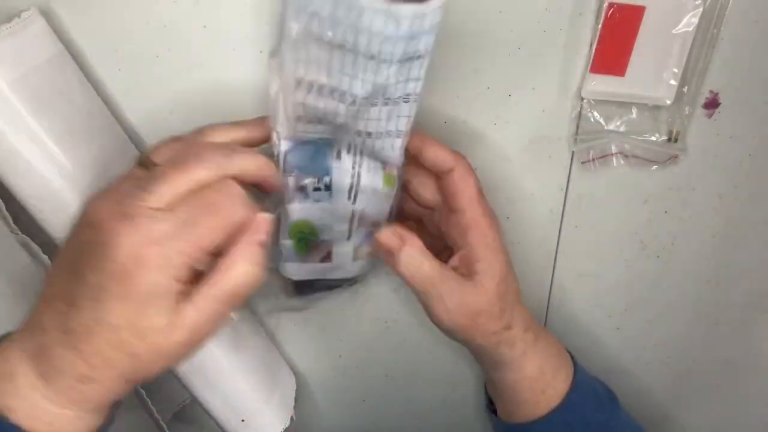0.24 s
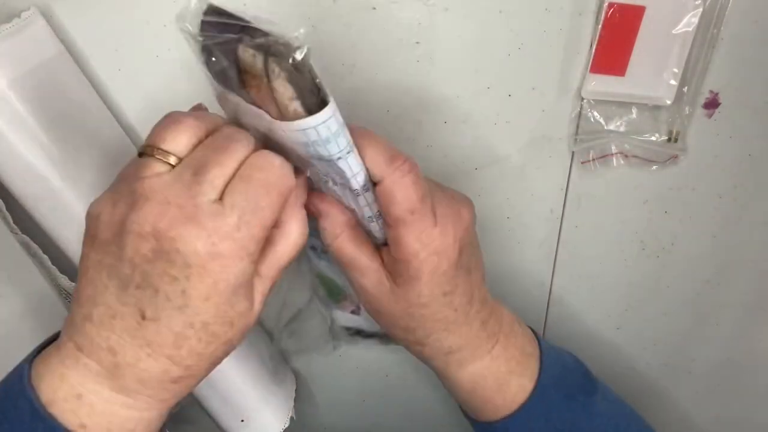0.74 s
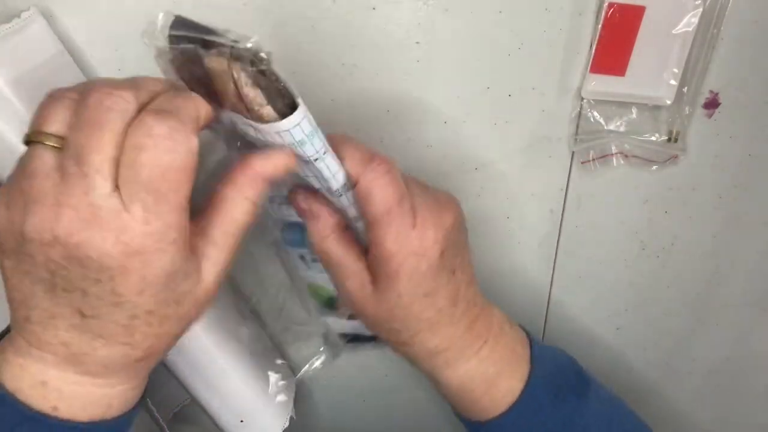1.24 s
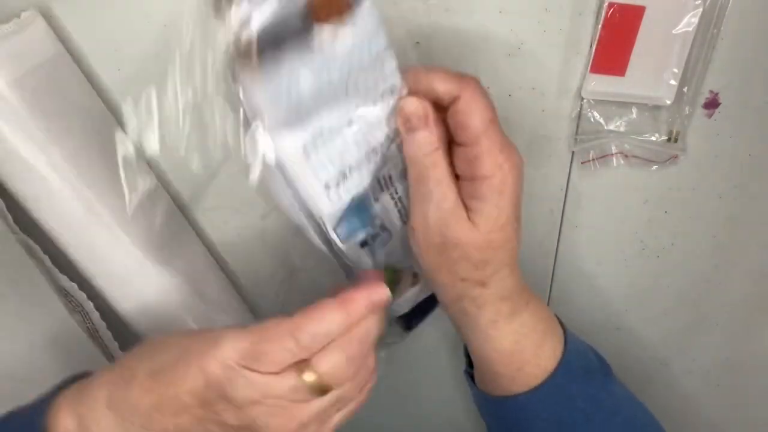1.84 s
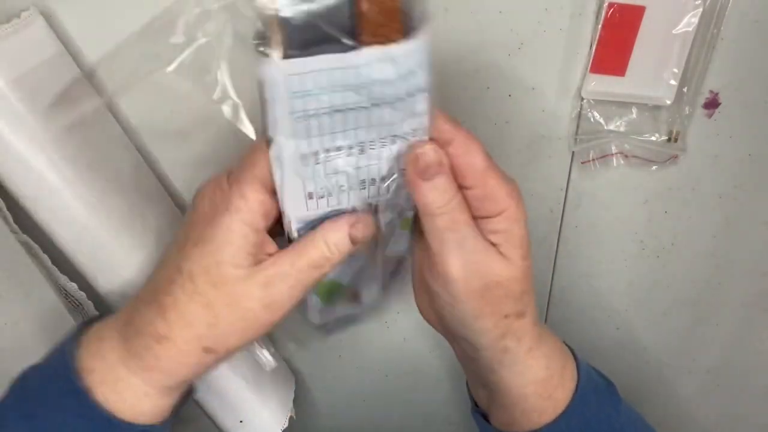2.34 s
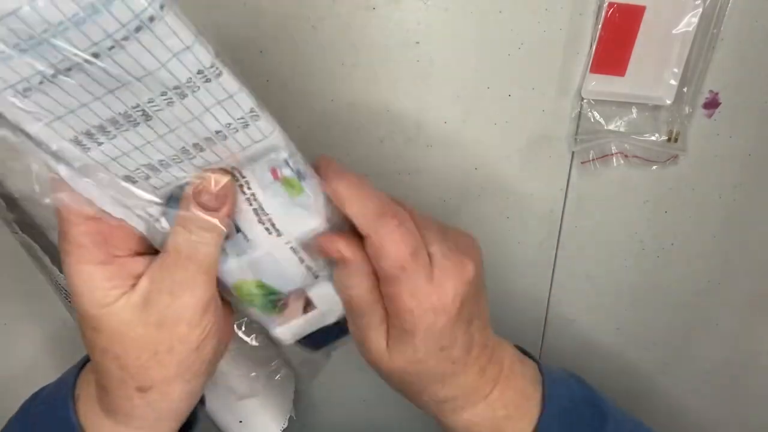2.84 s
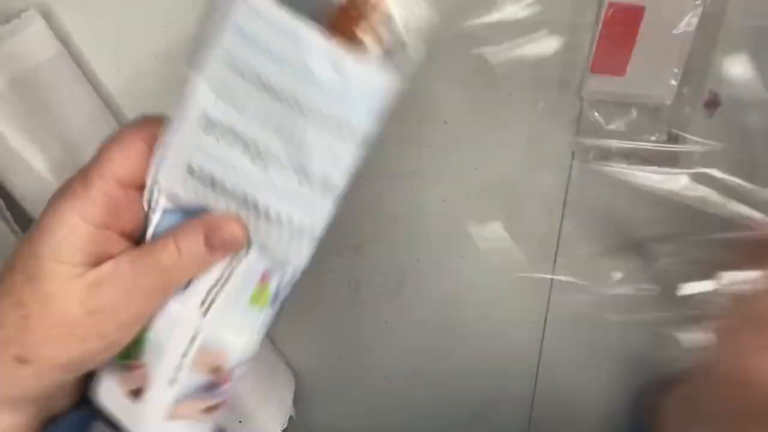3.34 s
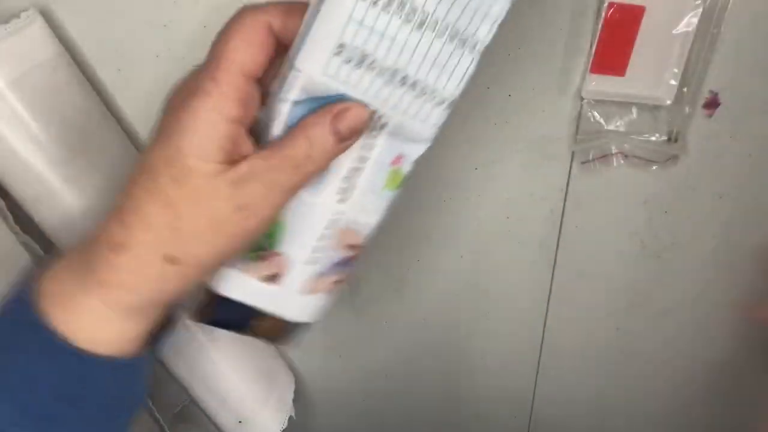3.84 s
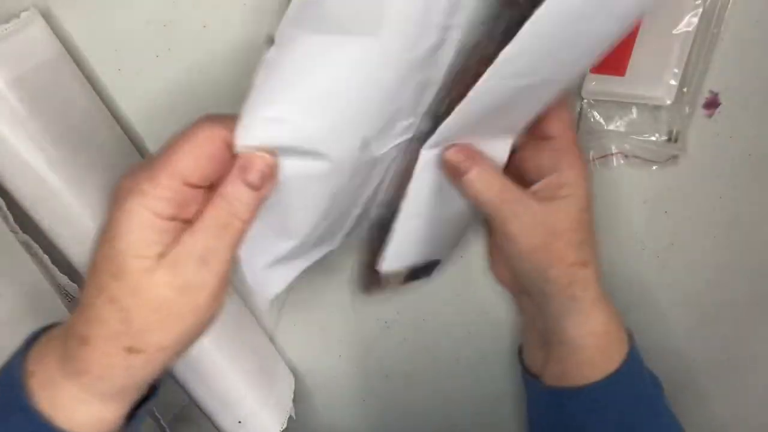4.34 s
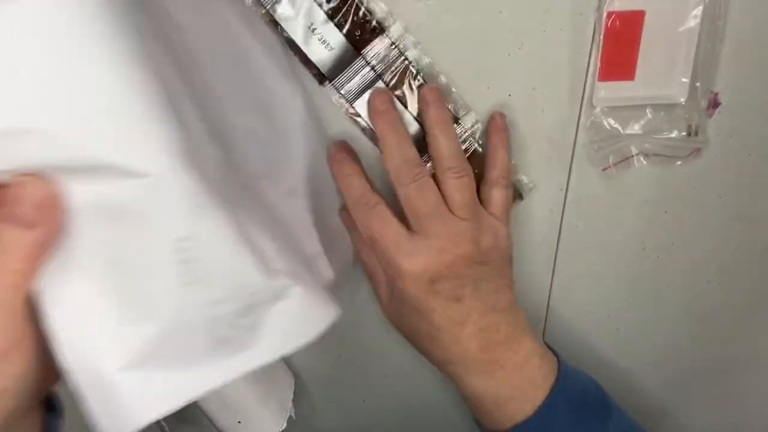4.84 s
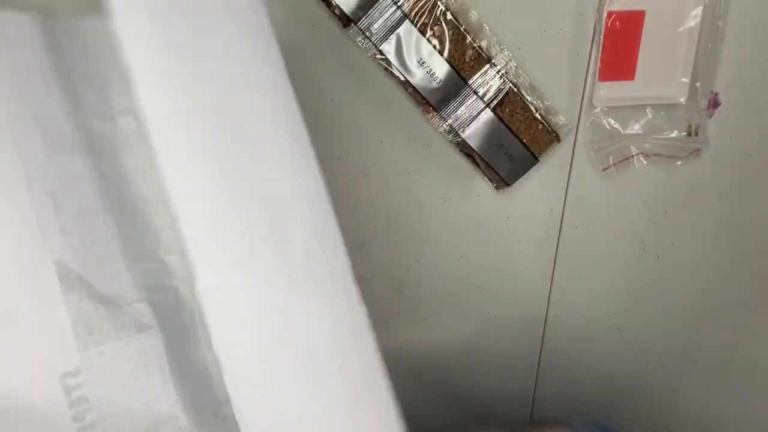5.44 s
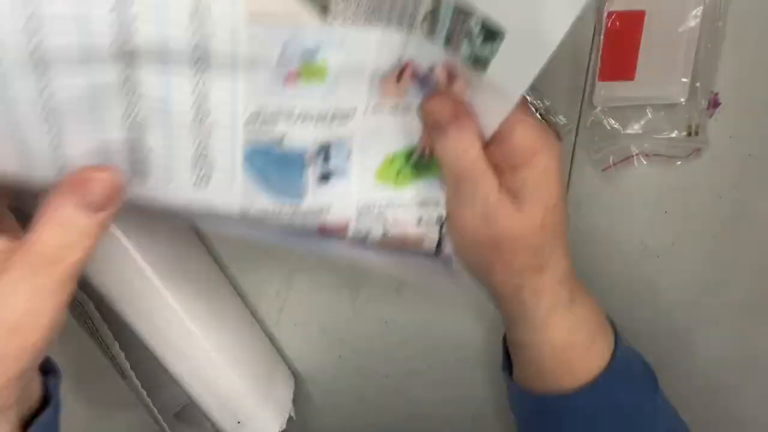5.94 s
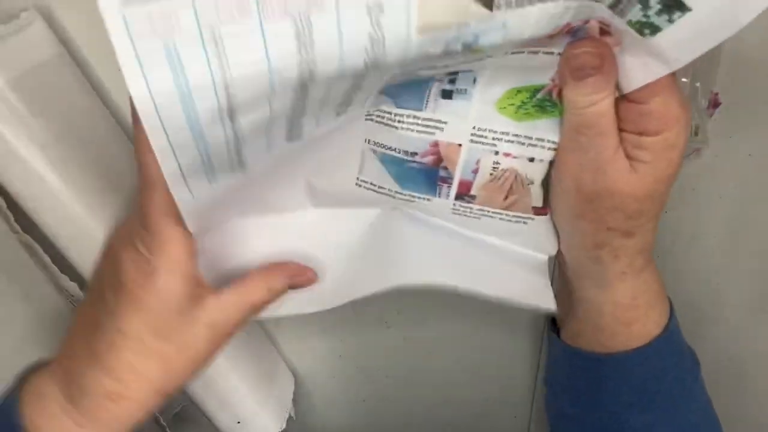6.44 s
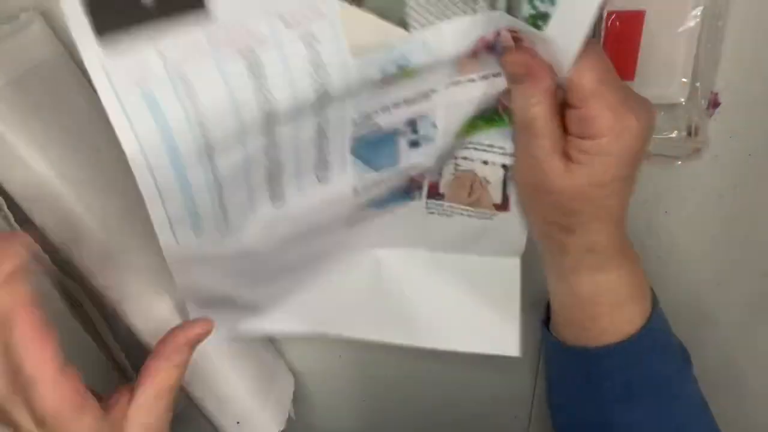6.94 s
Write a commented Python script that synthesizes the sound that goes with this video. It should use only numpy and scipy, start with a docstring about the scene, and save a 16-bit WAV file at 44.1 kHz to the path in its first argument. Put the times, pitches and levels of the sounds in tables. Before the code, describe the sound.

Close stereo pickup in a small, dry room. Hands work a folded leaflet out of a crisp plastic sleeve in bright, irregular crackles with one sharp pop early on. The handling quiets, then a packet lands on the table with a low, soft thump. Smooth paper sliding and low flapping follow, and finally the sheet is unfolded with louder, duller snaps and hollow pops.

```python
"""Crackle of plastic and paper: hands pull a leaflet from a sleeve, tip a packet onto the table, unfold the sheet.
Each stroke sets off a swarm of tiny buckles: noise bursts in three voices (flex, crease, tick); sliding hisses.
Big buckles snap as jerky noise bursts; dents pop as short tones that sag in pitch. Plastic is bright, paper dull.
The table takes soft thumps (falling sweeps, knock, low mode) and rings as the packet lands.
A small room and a close pair of microphone ports hear it, over a faint room tone."""
import sys
import numpy as np
from scipy import signal
from scipy.fft import rfft, irfft, next_fast_len
from scipy.io import wavfile

SR = 44100
rng = np.random.default_rng(int(sys.argv[2]) if len(sys.argv) > 2 else 0)


def digitize_waveform(pressure):
    """Quantize a signal to 16-bit integers and store it at the path in sys.argv[1].

    Rows of a 2-D input are taken as channels; values are limited to [-1, 1].
    """
    field = np.atleast_2d(pressure).T
    bounded = np.clip(field, -1, 1)
    quanta = np.round(bounded * 32767).astype(np.int16)
    wavfile.write(sys.argv[1], SR, quanta)


N = 316988
TIME_S = np.arange(N) / SR

# room decay: f/Hz, t60/s
ROOM_T60 = [(100, 0.26), (700, 0.086), (14000, 0.047)]
# room tone spectrum: f/Hz, density/dB per Hz
ROOM_TONE = [(25, -17), (70, 14), (1000, -14), (15000, -43)]
# low table modes: f/Hz, level/dB
TABLE_MODES = [(101, -22.5), (270, -24.5), (368, -24)]
# bumps of hands and sheet on the table: t/s, sweep level/dB, start pitch f/Hz
THUMPS = [(0.702, -36, 222), (1.376, -29, 373), (3.193, -34, 260), (3.33, -33, 172), (4.051, -33.5, 219),
          (4.286, -32.5, 240), (4.477, -24, 482), (4.595, -25, 190), (4.874, -21.5, 168), (5.192, -37, 394),
          (5.279, -30, 130), (5.568, -25.5, 300), (5.683, -26, 433)]
# whole dents that flip at one pitch: t/s, rise/ms, tone peak/dB, settled pitch f/Hz
POPS = [(.884, 1.8, -22.5, 720), (1.186, 1, -22.5, 1420), (1.5583, 0.11, -2.5, 3000),
        (1.8327, 1.1, -18.5, 874), (3.083, 0.48, -18, 1000), (3.6064, 0.17, -11, 1750),
        (3.811, 0.47, -30, 720), (3.8646, 0.51, -30.5, 1650), (3.911, 0.46, -35, 1300),
        (4.0338, 0.43, -20.5, 1040), (4.0481, 0.74, -16.5, 800), (4.4877, 1.8, -16, 790),
        (5.613, 0.78, -10.5, 463), (5.8472, 0.95, -12.5, 593), (5.9025, 1.1, -31.5, 544),
        (6.1, 1.2, -14.5, 870), (6.1155, 0.58, -9.5, 670), (6.2402, 0.92, -20, 790),
        (6.2556, 1.8, -20, 640), (6.2863, 0.32, -17, 1580), (6.4164, 1.1, -22.5, 740),
        (6.4397, 0.65, -17, 1900), (6.5167, 0.74, -16.5, 735), (6.6897, 0.37, -9.5, 1940),
        (6.7442, 0.31, -20, 1050), (6.7943, 0.92, -24, 537), (6.9127, 4.1, -24.5, 598)]
# typical small-dent pitch in flex, crease, tick: f/Hz
DENT_HZ = (790, 2330, 8830)
# single big buckles: t/s, decay/ms, crease level/dB, tilt/dB (+ bright, - dull)
SNAPS = [(.0097, 1, -22.5, -5), (0.0374, 2.8, -21, -5.5), (0.21, 3.8, -30.5, -4), (.315, 2.5, -28.5, 1),
         (0.3591, 1.9, -25.5, 3), (0.3838, 1.2, -24, 2.5), (0.532, 0.52, -36.5, 7.5),
         (0.47, 0.92, -41.5, 14.5), (.571, 1.4, -36.5, 0), (0.6468, 2.2, -27, -1.5),
         (0.697, 1.05, -32, 1.5), (.829, 7, -17.5, -2), (.853, 1.8, -25, 5), (1.0441, 2.4, -28.5, 3.5),
         (1.0548, 3.8, -28, -6.5), (1.0876, 3, -27.5, 3.5), (1.13, 1.16, -33, 4), (1.276, 7.5, -28, -2),
         (1.308, 4.7, -25.5, 5), (1.3196, 1, -26.5, -8), (1.419, 12, -26, 5), (1.504, 1, -36.5, 5),
         (1.6067, .6, -34.5, 0), (1.616, 1.1, -29, -1), (1.6857, 2.4, -28, 3.5), (1.709, 0.5, -32, 10),
         (1.7799, 2.95, -26.5, -3.5), (1.9236, 2.8, -33, 3), (2.0126, 0.68, -27, 3.5), (2.183, 2, -37, 14),
         (2.3526, 3.1, -28, -4), (2.429, 5.5, -22, 5), (2.5341, 3.6, -27, -3.5), (2.5887, 1.55, -31, -6),
         (2.635, 0.77, -29, 5), (2.686, 2, -25.5, 6), (2.738, 1.1, -34.5, 6), (2.7724, 3.6, -26.5, 4.5),
         (2.8157, 3.9, -27, 3), (2.8416, 1.8, -29, 2), (2.8565, 0.99, -33, 6.5), (2.914, 5, -26, 5),
         (2.99, 1, -32.5, 5), (3.0454, 1.5, -27, 13.5), (3.144, 2.2, -28.5, 11.5), (3.187, 4.5, -21.5, 0.5),
         (3.273, 2.2, -28.5, 3), (3.4106, 1.7, -34, 11.5), (3.42, 0.76, -29, 1), (3.5016, 3.1, -33.5, 10.5),
         (3.552, 2.25, -31, 7), (3.575, 0.71, -35.5, 4), (3.638, 0.93, -41, 12.5), (3.7295, .6, -43.5, 1.5),
         (3.7756, 1.9, -40.5, 6), (3.838, 1.2, -43, 2), (3.9713, 3.4, -35.5, -4.5),
         (4.012, 2.5, -28.5, -0.5), (4.047, 1.6, -27.5, 2.5), (4.1795, 5.3, -28, -2.5),
         (4.412, 3.8, -30.5, -5), (4.4884, 1.44, -25, 0.5), (5.026, 9.5, -31.5, -7),
         (5.09, 0.98, -37, -1.5), (5.192, 4.2, -36, -6.5), (5.268, 2.5, -37.5, -3), (5.342, 3.5, -33.5, -8),
         (5.4008, 4.5, -33.5, -8.5), (5.4977, 4.1, -36.5, -2.5), (5.641, 2.5, -34, -8),
         (5.6132, 3.1, -29.5, -13.5), (5.72, 3.9, -26, -5), (5.7527, 7.5, -20.5, -4),
         (5.8258, 2.4, -32.5, -6), (5.962, 1.4, -37.5, 2.5), (6.017, 7.4, -23, -6), (6.0295, 3.6, -22, -4),
         (6.0784, 2.6, -19, -2.5), (6.109, 2.14, -20.5, -3), (6.1594, 2.3, -15.5, -1),
         (6.2255, 1.8, -27, -5.5), (6.2644, 2.1, -26.5, -2), (6.3154, 7.6, -30.5, -9),
         (6.3836, 5.3, -27, -8), (6.4601, 4.05, -28.5, -6), (6.5159, 3.8, -34, -3), (6.578, 7.6, -22.5, -6),
         (6.615, 6.3, -24.5, -9), (6.64, 1.1, -25.5, -0.5), (6.6498, 4, -17.5, -3.5), (6.665, 3.3, -23, 0),
         (6.8113, 2.9, -29, -3.5), (6.844, 2.7, -29, 3), (6.905, 2.25, -29.5, -4.5),
         (7.092, 5.3, -29, -7.5), (7.132, 3.3, -25, -6.5)]
# pulls, pushes and folds: t/s, length/s, crease level/dB, swell start to end/dB, tilt/dB (+ bright, - dull)
STROKES = [(0, 0.075, -21.5, 0.5, 0.5), (0.162, 0.056, -32.5, 6.5, 1), (0.352, 0.095, -30, 5, -0.5),
           (0.544, 0.03, -35.5, -1, 2.5), (0.751, 0.12, -26, 3.5, -0.5), (1.015, 0.083, -34, -4, 2),
           (1.31, 0.12, -23.5, 8, 0), (1.669, 0.14, -29, -8, -1), (1.812, 0.038, -28.5, 3.5, 2),
           (1.996, 0.078, -32.5, -1, 1.5), (2.128, 0.068, -31.5, -2, 2.5), (2.227, 0.26, -33, 9.5, -0.5),
           (2.606, 0.095, -24.5, 4.5, 2.5), (2.735, 0.17, -31.5, -4.5, 0.5), (3.028, .2, -27, 6.5, 3),
           (3.234, 0.2, -36, -16.5, 0), (3.503, 0.051, -36.5, 3, 3), (3.969, 0.083, -36, -9, 4.5),
           (4.263, 0.1, -37, -2.5, -3.5), (4.438, 0.073, -27, -3, -2), (4.588, 0.17, -38, -20.5, 3.5),
           (4.85, 0.15, -36.5, 7.5, 0.5), (5.266, 0.12, -36, -6, -2), (5.467, 0.058, -40.5, 0, -1.5),
           (5.56, 0.17, -29.5, 2.5, -2.5), (6.024, 0.022, -28.5, 4, 1), (6.058, .14, -26, -3, -3.5),
           (6.243, 0.086, -36.5, 17.5, -2.5), (6.355, 0.11, -42, 10, 3.5), (6.491, 0.065, -33, 8.5, 1),
           (6.608, .13, -26, -11.5, -2.5), (6.819, 0.092, -33, -3, -1), (7.089, 0.098, -35.5, 4, -2)]
# rustle of merely holding the bundle: t/s, crease level/dB, tilt/dB
HOLDING = [(0, -35.5, 5.5), (.5, -40.5, -2.5), (.98, -41, 2.5), (1.5, -36.5, -1), (2.57, -39, 1),
           (2.96, -31.5, 3.5), (3.44, -39.5, 3), (3.68, -48.5, 1.5), (3.94, -49.5, 5.5), (4.08, -41, 3.5),
           (4.54, -38, 6), (5.08, -43.5, -0.5), (5.24, -50, 1.5), (5.8, -42.5, -5.5), (5.93, -55.5, -4.5),
           (6.05, -35.5, -7.5), (6.98, -48.5, -4.5), (7.19, -40, 0)]
# smooth sliding in the handling: t/s, share/0-1
SLIDING = [(0, 0.2), (3.4, .25), (3.75, .65), (4.15, .85), (5.0, .85), (6.1, 0.35)]
# low flapping of the swinging sheet: t/s, level re flex/dB
SWING = [(0, -16.5), (2.4, -10.5), (3.3, -9), (3.8, -7), (4.3, -23), (4.55, -8), (4.98, -6), (5.4, 3.5),
         (5.7, -6), (6.2, -6.5), (7.19, -10.5)]
# voices of a buckle: f/Hz, density/dB per Hz
FLEX = [(60, -16.5), (280, -10.5), (400, -5), (520, -7.5), (690, 2.5), (950, -1.5), (1400, -4.5),
        (2200, -9.5), (6000, -46)]
CREASE = [(300, -65), (900, -12.5), (1600, 1.5), (2400, 1.5), (3500, 0.5), (5500, 0), (7500, -10),
          (14000, -63)]
TICK = [(1000, -58), (4000, -4), (6500, -1), (9500, -0.5), (12000, -6), (15600, -6.5)]
# loose sheet, also the knock on the table: f/Hz, density/dB per Hz
FLAP = [(20, -51), (60, 1.5), (110, -2), (200, -7.5), (400, -7), (650, -20.5), (3000, -79)]
# material in hand and its place: t/s, top treble/dB, left minus right/dB
SHEET = [(0, 2.5, 0), (2.3, 2, -0.5), (3.5, -3.5, 0.2), (4.6, -2, 0.5), (5.2, 0.5, -1), (6.1, -2.5, -0.2),
         (6.7, -2, 2), (7.19, -3.5, -1)]
# microphone ports: f/Hz, lead of left/rad
PORT_PHASE = [(0, 0), (1500, .4), (3700, 1.5), (5500, 2.7), (7000, 2.7), (9600, 0), (12800, -3.1),
              (15600, -6.2)]
# microphone ports: f/Hz, left minus right/dB
PORT_BALANCE = [(600, 3.8), (2000, 2.15), (5000, 2.8), (9000, 0.22)]

LANDING_S, TABLE_DECAY_S = 4.481, 0.024  # decay to 1/e
DENT_STRETCH, DENT_RELAX_RISES = .3, 1.73  # starts sharp by this share, relaxes over so many rise times
DENT_RING_DB, DENT_RING_MS = -18, 2.9  # the sheet rings on after a flip
FLEX_DB = -3  # re crease at zero tilt
BODY_WANDER_OCTAVES, SLACK_OCTAVES_PER_DB = .24, 0.0136  # chance shift; drop as the sheet swings loose
SWARM_RIPPLE_DB, SNAP_RIPPLE_DB = 3.6, 3.8
STROKE_ATTACK_S, STROKE_RELEASE_S = 0.0088, 0.017
TOP_TREBLE_HZ, TOP_HZ = 9000, 15850
SIDES = np.array([[.5], [-.5]])  # left, right half of a difference


def amp(db):
    """Decibels to gain."""
    return 10 ** (np.asarray(db) / 20)


def unit(x):
    """x at rms 1."""
    return x / np.sqrt(np.mean(x ** 2) + 1e-20)


def along(points, hz):
    """(f/Hz, value) points read on a log frequency axis."""
    f, v = np.transpose(points)
    return np.interp(np.log(hz + 1), np.log(f + 1), v)


def curves(rows):
    """One value per sample for each column after the time."""
    s, *cols = np.transpose(rows)
    return np.array([np.interp(TIME_S, s, c) for c in cols])


def filtered(x, response):
    """x times a complex response of frequency."""
    m = next_fast_len(N + SR // 2)
    return irfft(rfft(x, m) * response(np.fft.rfftfreq(m, 1 / SR)), m)[..., :N]


def ring(x, spectrum, ripple_db=0, size=1024, count=56):
    """Causal (minimum-phase) body filter; ripple gives the chance resonances of one momentary shape."""
    hz = np.fft.rfftfreq(size, 1 / SR)
    knots = np.linspace(0, 1, count)
    shape_db = np.interp(np.sqrt(hz / hz[-1]), knots, rng.standard_normal(count))
    cepstrum = irfft(np.log(amp(along(spectrum, hz) + ripple_db * shape_db)))
    # fold the cepstrum onto positive time
    cepstrum[1:size // 2] *= 2
    cepstrum[size // 2 + 1:] = 0
    response = irfft(np.exp(rfft(cepstrum)))
    response /= np.linalg.norm(response)
    return signal.fftconvolve(x, response[None], axes=1)[:, :x.shape[1]]


def add(track, s, sound):
    """Mix a sound into the track at time s."""
    start = max(round(s * SR), 0)
    space = track[..., start:start + sound.shape[-1]]
    space += sound[..., :space.shape[-1]]


def changing(x, answer, size=1024):
    """Pass overlapping pieces of x through answer(piece, s), so the resonances move from piece to piece."""
    out, fade = np.zeros((2, N + size)), signal.windows.hann(2 * size, sym=False)
    x = np.pad(x, ((0, 0), (size, 2 * size)))
    for start in range(0, N + size, size):
        piece = np.pad(x[:, start:start + 2 * size] * fade, ((0, 0), (0, size)))
        add(out, start / SR, answer(piece, start / SR))
    return out[:, size:]


def spread_noise(size, width):
    """Noise from a wide source: a common part plus a part of opposite sign at the two ports."""
    common, apart = rng.standard_normal((2, size))
    return np.array([common + width * apart, common - width * apart])


def room_tone(level_db):
    """Steady wide noise, mostly low."""
    return amp(level_db) * unit(ring(spread_noise(N, 0.63), ROOM_TONE, size=8192))


def room(x):
    """Short diffuse tail: decaying noise, different at each port and redrawn from piece to piece."""
    def answer(piece, s):
        hz, t, z = signal.stft(rng.standard_normal((2, SR // 6)), SR, nperseg=256)
        decay = amp(-60 * t / along(ROOM_T60, hz)[:, None])
        tail = signal.istft(z * decay, SR, nperseg=256)[1]
        delay = round(.004 * SR)
        tail = np.pad(tail / np.linalg.norm(tail[0]), ((0, 0), (delay, 0)))
        return signal.fftconvolve(piece, tail, axes=1)

    colour = [(150, -14.0), (700, -7.5), (4000, -9.0), (10000, -23.0)]  # f/Hz, level/dB
    return filtered(changing(x, answer, size=8192), lambda hz: amp(along(colour, hz)))


def landing(attack_s):
    """The packet lands on the table top and sets its low modes ringing: decaying sines."""
    out, t = np.zeros((2, N)), np.arange(SR // 2) / SR
    fade = (1 - np.exp(-t / attack_s)) * np.exp(-t / TABLE_DECAY_S)
    for hz, db in TABLE_MODES:
        add(out, LANDING_S, amp(db) * fade * np.sin(2 * np.pi * (hz * t + rng.random())))
    return out


def thumps(end_hz, glide_s, linger_glides, attack_s, knock_db,
           mode_db=-18.0, mode_decay_s=0.062, buffet_hz=260, count=90):
    """Dull knock, bending waves sweeping down (high ones first, in broken buffets), lowest table mode."""
    out, t = np.zeros((2, N)), np.arange(SR // 3) / SR
    knots_s = np.linspace(0, t[-1], count)
    rise, fall = (1 - np.exp(-t / attack_s)) ** 2, np.exp(-t / (linger_glides * glide_s))
    swell = rise * fall / (rise * fall).max()
    for s, db, start_hz in THUMPS:
        hz = end_hz + (start_hz - end_hz) * np.exp(-t / glide_s)
        rough = hz ** 4 / (hz ** 4 + buffet_hz ** 4)  # the high part breaks up
        stray, jolt = (np.interp(t, knots_s, knots) for knots in rng.standard_normal((2, count)))
        phase = 2 * np.pi * np.cumsum(hz) / SR + np.pi * np.sqrt(rough) * stray
        waves = np.sin(phase) * (1 + rough * jolt) * swell
        knock = unit(ring(spread_noise(len(t), 0.91), FLAP)) * fall
        knock *= start_hz / buffet_hz  # bumps that start higher rattle more
        mode = np.sin(2 * np.pi * (TABLE_MODES[0][0] * t + rng.random())) * rise * np.exp(-t / mode_decay_s)
        add(out, s, amp(db) * (waves + amp(knock_db) * knock + amp(mode_db) * mode))
    return out


def voices():
    """Spectrum, stereo width and freedom to shift in pitch (0-1) of flex, crease and tick."""
    return [(FLEX, .25, 1), (CREASE, .68, .5), (TICK, .22, 0)]


def voice_levels(level_db, tilt_db):
    """Levels of flex, crease, tick: tilt trades dull flexing for bright tick."""
    return np.array([level_db + FLEX_DB - tilt_db, level_db, level_db + tilt_db])


def handling():
    """Voice levels/dB over time: strokes set in, swell or fade and let go, over the rustle of holding."""
    power = amp(voice_levels(*curves(HOLDING))) ** 2
    t = np.arange(SR // 2) / SR
    for s, length_s, level_db, swell_db, tilt_db in STROKES:
        onset = np.clip(t / STROKE_ATTACK_S, 0, 1)
        release = np.exp(-np.maximum(t - length_s, 0) / STROKE_RELEASE_S)
        swell = amp(swell_db * (np.clip(t / length_s, 0, 1) - .5))
        levels = amp(voice_levels(level_db, tilt_db))[:, None]
        add(power, s, (levels * onset * release * swell) ** 2)
    return 10 * np.log10(power)


def shape_at(s, spectrum, freedom):
    """Voice spectrum of the bent sheet at time s: lower when it swings loose, and shifted by chance."""
    times_s, swing_db = np.transpose(SWING)
    slack_db = np.interp(s, times_s, swing_db) - swing_db.mean()
    chance = np.clip(rng.standard_normal(), -2, 2)
    octaves = BODY_WANDER_OCTAVES * chance - SLACK_OCTAVES_PER_DB * slack_db
    return [(hz * 2 ** (freedom * octaves), db) for hz, db in spectrum]


def dent(hz, rise_ms, size=1536):
    """Envelope and tone of one flipping dent: a short tone that swells, sags in pitch and dies."""
    t_ms = 1000 * np.arange(size) / SR
    age = t_ms / max(rise_ms, .03)
    ringing = amp(DENT_RING_DB) * (1 - np.exp(-age)) * np.exp(-t_ms / DENT_RING_MS)
    swell = age * np.exp(1 - age) + ringing
    pitch_hz = hz * (1 + DENT_STRETCH * np.exp(-age / DENT_RELAX_RISES))
    return swell, swell * np.sin(2 * np.pi * (np.cumsum(pitch_hz) / SR + rng.random()))


def pops(rough_db, below_db, above_db, size=1536):
    """Big dents ring, with a rasp of fibres round the pitch; its flanks fall by so many dB in 3 octaves."""
    out, flank = np.zeros((2, N)), 8
    for s, rise_ms, peak_db, hz in POPS:
        swell, tone = dent(hz, rise_ms, size)
        flanks = [(hz / flank, below_db), (hz, 0), (hz * flank, above_db), (hz * flank * 2, 2 * above_db)]
        rasp = unit(ring(swell * spread_noise(size, 0.37), flanks))
        add(out, s, amp(peak_db) * (tone + amp(rough_db) * tone.std() * rasp))
    return out


def small_dents(level_db, octaves, rise_cycles, scatter_db, pan_db, count=600):
    """Small dents flip all through the handling, each with its own pitch, strength and place."""
    out = np.zeros((2, N))
    for centre_hz, voice_db in zip(DENT_HZ, handling()):
        swarm = np.zeros((2, N))
        times_s = rng.random(count) * N / SR
        chances = np.clip(rng.standard_normal((count, 3)), -2, 2)
        for s, (pitch, strength, side) in zip(times_s, chances):
            hz = min(centre_hz * 2 ** (octaves * pitch), TOP_HZ)
            tone = dent(hz, 1000 * rise_cycles / hz, size=512)[1]
            add(swarm, s, tone * amp(scatter_db * strength + pan_db * side * SIDES))
        out += amp(voice_db + level_db) * unit(swarm)
    return out


def snaps(rise_decays, jerk_ms, count=7, size=2560):
    """A big buckle swells in quickly, runs along its crease in a few jerks and rings with its own colour."""
    out, lead = np.zeros((2, N)), size // 8
    t_ms = 1000 * (np.arange(size) - lead) / SR
    span, glide = .01 * SR, .12  # level refers to energy over 10 ms; glide is the steady part between jerks
    for s, decay_ms, snap_db, tilt_db in SNAPS:
        decay_ms = max(decay_ms, .1)
        age = np.maximum(t_ms / decay_ms, -10)
        fade = np.exp(-age) / (1 + np.exp((.5 - age) / max(rise_decays, .1)))
        jerk_at_ms = decay_ms * .5 * (np.arange(count) - 1 + rng.random(count))[:, None]
        since_ms = t_ms - jerk_at_ms
        force = rng.uniform(0.41, 2.1, (count, 1)) ** 2
        jerks = (force * (since_ms > 0) * np.exp(-2 * np.abs(since_ms) / jerk_ms)).sum(0)
        fade = fade * np.sqrt(glide + jerks)
        for (spectrum, width, freedom), level_db in zip(voices(), voice_levels(snap_db, tilt_db)):
            shape = shape_at(s, spectrum, freedom)
            burst = ring(fade * spread_noise(size, width), shape, SNAP_RIPPLE_DB)
            add(out, s - lead / SR, amp(level_db) * unit(burst) * np.sqrt(span / size))
    return out


def buckles(sizes, life_ms, sliding, scatter_db=3):
    """Loudness of a burst swarm: the local mean is levelled, chance shares it out, sliding fills the gaps."""
    energy = (sizes * amp(scatter_db * rng.standard_normal(N))) ** 2
    energy = signal.lfilter([1], [1, -np.exp(-2000 / (life_ms * SR))], energy)
    hand = signal.windows.hann(round(0.064 * SR))
    local_mean = np.abs(signal.fftconvolve(energy, hand / hand.sum(), "same"))
    energy = energy / (local_mean + 1e-6)
    return np.sqrt(sliding + (1 - sliding) * energy)


def crackle(per_second, effort_power, scatter_db, lives_ms, flap_ms):
    """Swarms of tiny buckles, shared by the three voices; the loose sheet flaps low along with them."""
    levels_db, out = handling(), np.zeros((2, N))
    flex_db, crease_db, _ = levels_db
    rate_hz = per_second * unit(amp(crease_db)) ** effort_power  # harder handling breaks more creases
    strength = np.clip(rng.standard_normal(N), -2.3, 2.3)
    sizes = (rng.random(N) < rate_hz / SR) * amp(scatter_db * strength)
    sliding = np.clip(curves(SLIDING)[0], 0, 1)
    smoothness = (sliding / 2, sliding, sliding)  # flexing stays jerkier
    for voice, level_db, life_ms, smooth in zip(voices(), levels_db, lives_ms, smoothness):
        spectrum, width, freedom = voice
        bursts = buckles(sizes, life_ms, smooth) * spread_noise(N, width)

        def bending(piece, s):
            return ring(piece, shape_at(s, spectrum, freedom), SWARM_RIPPLE_DB)

        out += amp(level_db) * unit(changing(bursts, bending))
    flaps = ring(buckles(sizes, flap_ms, sliding / 2) * spread_noise(N, 0.46), FLAP, size=8192)
    return out + amp(flex_db + curves(SWING)[0]) * unit(flaps)


def facing(x):
    """The material in hand sets the top treble; its place sets the balance."""
    top_db, pan_db = curves(SHEET)
    top = filtered(x, lambda hz: 1 / (1 + (TOP_TREBLE_HZ / (hz + 1)) ** 20))
    return (x + (amp(top_db) - 1) * top) * amp(SIDES * pan_db)


def scene():
    """Paper, plastic and table in the room."""
    table = landing(attack_s=0.0038)
    table += thumps(end_hz=41.4, glide_s=.016, linger_glides=1.54, attack_s=0.0018, knock_db=-10)
    sheet = pops(rough_db=-4.5, below_db=-20.5, above_db=-24.5)
    sheet += small_dents(level_db=-9.5, octaves=0.51, rise_cycles=0.47, scatter_db=3.5, pan_db=4.5)
    sheet += snaps(rise_decays=0.31, jerk_ms=0.62)
    sheet += amp(-3.0) * crackle(per_second=300, effort_power=.65, scatter_db=3.0,
                                 lives_ms=(2.6, 1.1, .55), flap_ms=15.0)
    near = facing(sheet) + filtered(table, lambda hz: 1 - 1 / (1 + (hz / 38) ** 6))  # low cut
    return near + room(near) + room_tone(level_db=-57.0)


def record(dry):
    """Ports differ in phase and level; the highest peaks are rounded off; nothing passes above TOP_HZ."""
    def ports(hz):
        lead_rad = np.interp(hz, *np.transpose(PORT_PHASE))
        return np.exp(1j * SIDES * lead_rad) * amp(SIDES * along(PORT_BALANCE, hz))

    heard = filtered(dry, ports)
    rounded = heard / (1 + (heard / .9) ** 4) ** .25
    return filtered(rounded, lambda hz: hz < TOP_HZ)


dry = scene()
out = record(dry)
digitize_waveform(out)
```